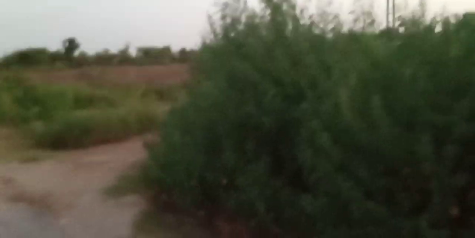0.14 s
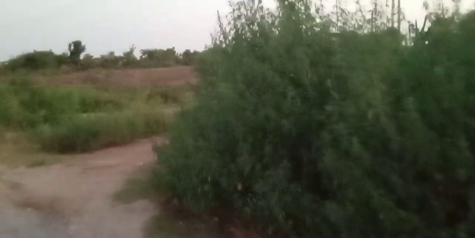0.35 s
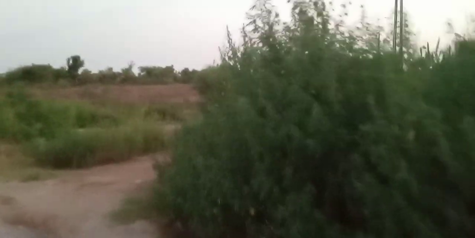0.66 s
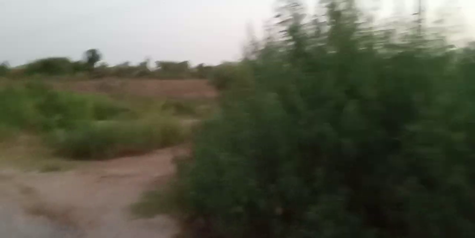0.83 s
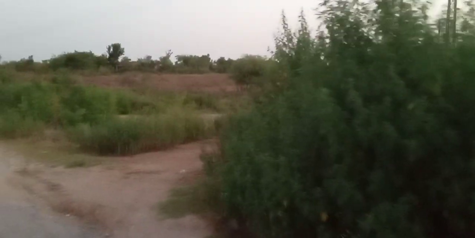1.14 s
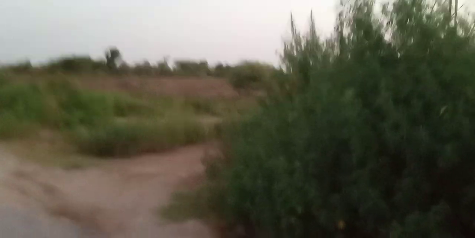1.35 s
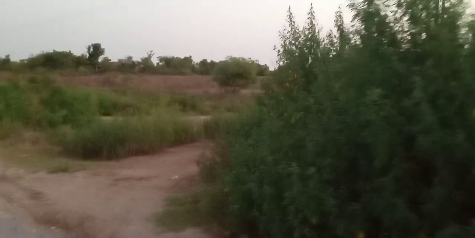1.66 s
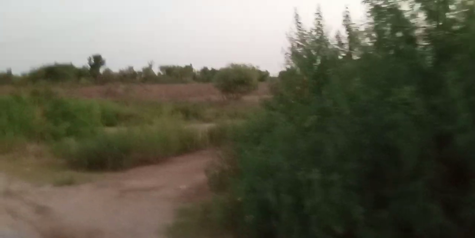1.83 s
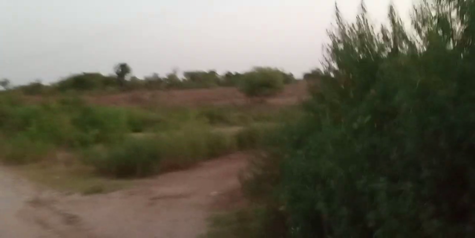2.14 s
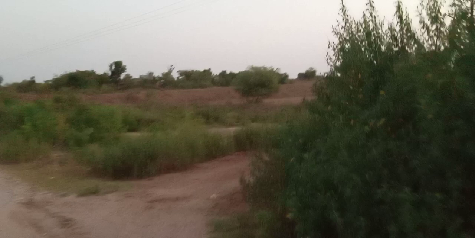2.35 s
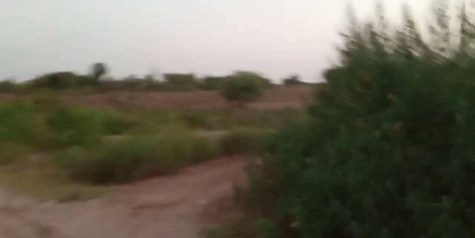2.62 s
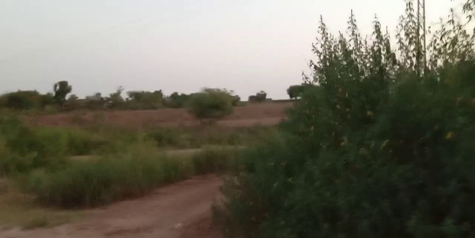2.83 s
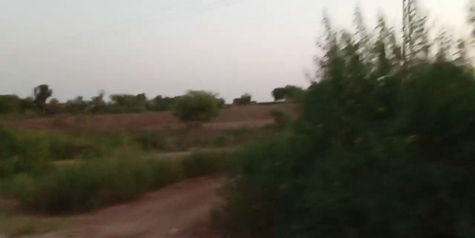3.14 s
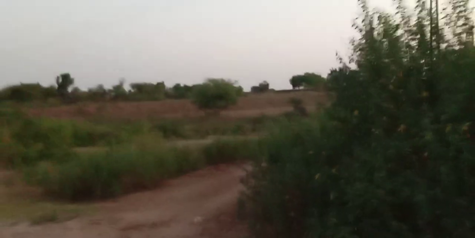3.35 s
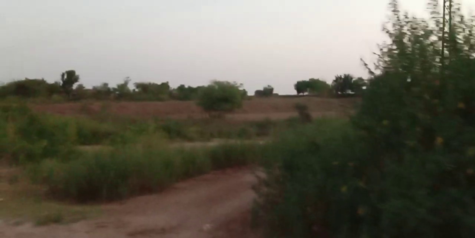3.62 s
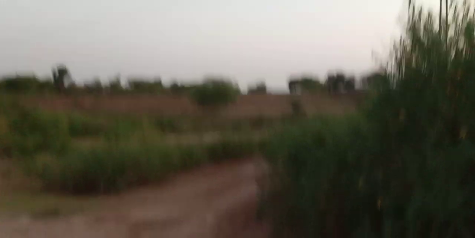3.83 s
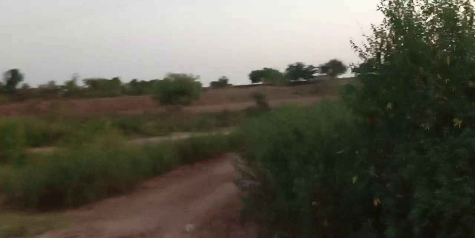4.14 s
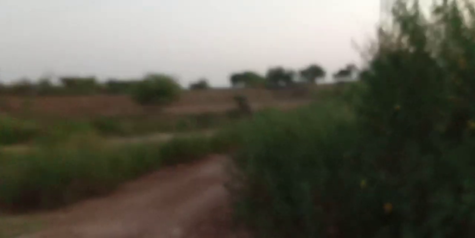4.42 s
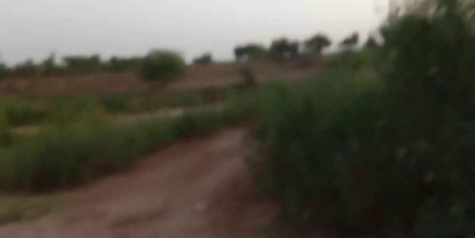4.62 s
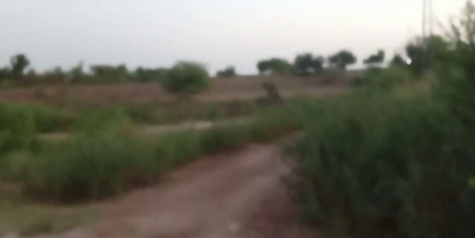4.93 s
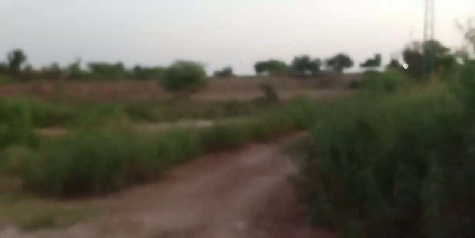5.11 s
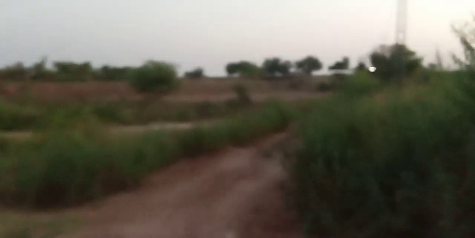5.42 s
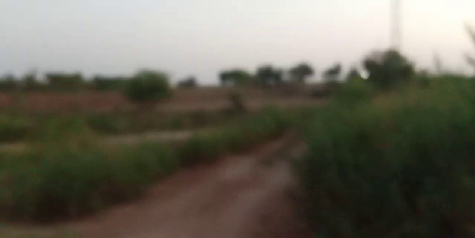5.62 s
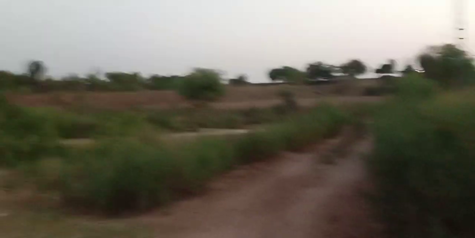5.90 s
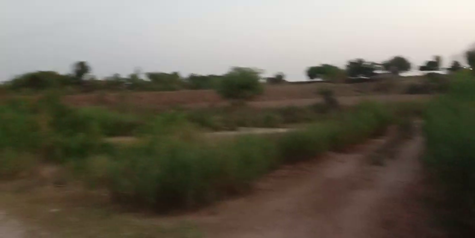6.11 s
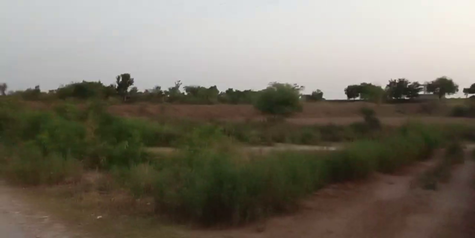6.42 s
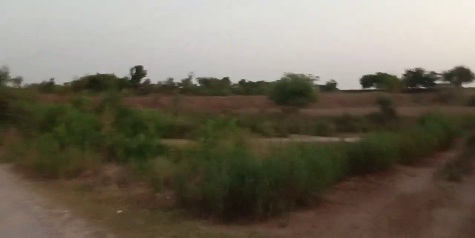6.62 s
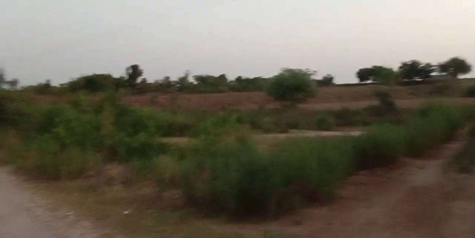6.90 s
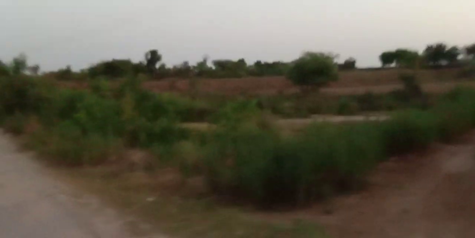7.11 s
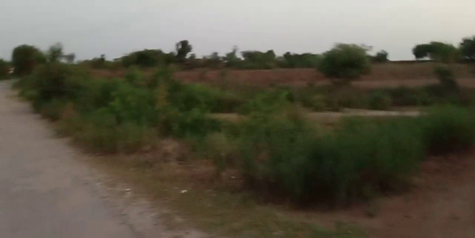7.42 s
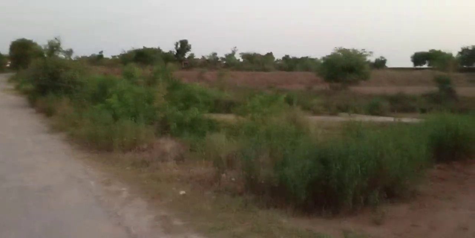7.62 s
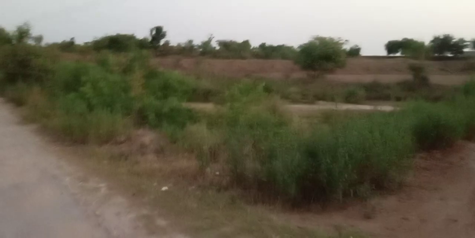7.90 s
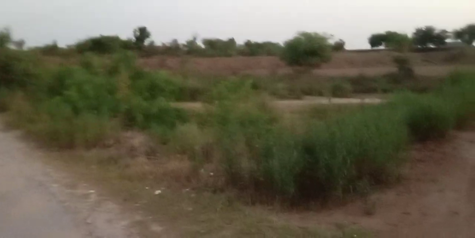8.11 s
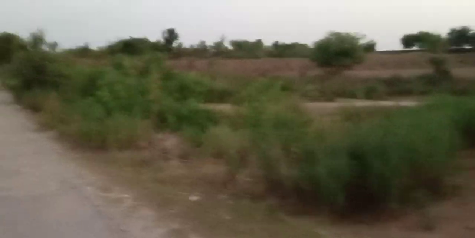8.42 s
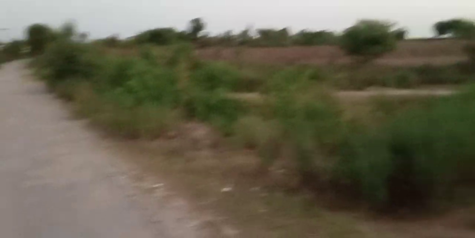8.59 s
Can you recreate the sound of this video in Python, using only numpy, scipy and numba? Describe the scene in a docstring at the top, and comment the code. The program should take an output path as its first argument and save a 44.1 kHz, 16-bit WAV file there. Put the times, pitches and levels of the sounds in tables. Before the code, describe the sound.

Continuous dense birdsong outdoors: rapid warbles, climbing and tumbling phrases, and rounded single chirps overlap at different sides. Rough buzzing calls and clear whistles come irregularly, with soft low slurs far off. Behind lie countless tiny chirps, a raspy insect that fades, and faint airy murmur. The small stereo microphone picks up low wind, skin rubs, clicks and dull knocks on its case, louder handling briefly ducking the birds; treble is muted, with slight hiss.

```python
"""Dawn chorus in scrubland

Heard on a hand-held phone turning slowly. Four small birds repeat phrases of gliding tones, bulbuls buzz
(pulse harmonics through throat resonances) and whistle, a far bird slurs low notes; behind them are a crowd
of short chirps, an insect of pulsed noise and far murmur. Wind bumps the left microphone port, fingers rub
and tick on the case, and a gain control driven by low sound on the left ducks after knocks."""
import sys
import numpy as np
from scipy import signal
from scipy.fft import rfft, irfft
from scipy.io import wavfile
from scipy.ndimage import uniform_filter1d
from numba import njit

SR = 44100
rng = np.random.default_rng(int(sys.argv[2]) if len(sys.argv) > 2 else 0)


def master(y):
    """Save y as 16-bit WAV."""
    cut = np.clip(np.atleast_2d(y).T, -1, 1)
    pcm = np.round(cut * 32767)  # scale
    wavfile.write(sys.argv[1], SR, pcm.astype(np.int16))


N = 385875

# kinds of burry bulbul note: (length [s], pulse start [Hz], pulse end [Hz], throat start [Hz],
# throat end [Hz], throat width [Hz], upper resonance [dB])
BURR_KINDS = {"rising": (0.088, 215, 250, 2500, 2760, 270, -10.5),
              "dropping": (.08, 399.5, 330, 2800, 2380, 150, -22),
              "long": (.175, 175, 150, 2250, 1810, 135, -8) , "level": (0.09, 212, 230, 2751, 2228, 122, -15.5),
              "low": (0.147, 240, 150, 1970, 1840.5, 98, -15),
              "short": (0.032, 219.5, 190, 2269, 2128, 142, -14)}


def undb(db):
    """Amplitude ratio: 20 dB is a factor of ten."""
    return 10 ** (np.asarray(db) / 20)


def level(x, db):
    """Root-mean-square scaling: unit power first, then a fixed or moving level in dB."""
    return x * undb(db) / np.sqrt(np.mean(x ** 2))


def curve(rows):
    """Linear interpolation: columns of a (time [s], value, ..) table at every sample."""
    s, *columns = np.transpose(rows)
    return [np.interp(np.arange(N) / SR, s, c) for c in columns]


def walk(rate):
    """Smoothed random steps: levels held 1 / rate seconds, slewed by two moving averages."""
    k = int(SR / rate)
    steps = np.repeat(rng.standard_normal(N // k + 1), k)
    return uniform_filter1d(uniform_filter1d(steps, k), k)[:N]


def coloured(points):
    """Spectral shaping: white noise weighted by (frequency [Hz], gain [dB]) points."""
    hz, db = np.transpose(points)
    bins = np.arange(N // 2 + 1) * SR / N + 1
    gain = undb(np.interp(np.log(bins), np.log(hz), db, -99, -99))
    return irfft(rfft(rng.standard_normal(N)) * gain, N)


def add(out, s, make, length, db, pan_db, lag_ms):
    """Level and time differences place a sound make(t); the left port hears it lag_ms late."""
    start, size = int(s * SR), int(length * SR) + 64
    keep = slice(max(-start, 0), max(N - start, 0))
    sides = [(pan_db / 2, lag_ms / 2000), (-pan_db / 2, -lag_ms / 2000)]
    for channel, (gain_db, lag) in enumerate(sides):
        t = np.clip((np.arange(size) - 32) / SR - lag, 0, length)
        piece = (undb(db + gain_db) * make(t))[keep]
        first = max(start, 0)
        out[channel, first:first + len(piece)] += piece


def flutter(length, rate, depth_db):
    """Scintillation: moving air and leaves between bird and phone waver the gain rate times a second."""
    points = undb(depth_db * rng.standard_normal(int(length * rate) + 2))
    return lambda t: np.interp(t * rate, np.arange(len(points)), points)


def note(length, hz0, hz1, hz2, edge=.75, top=.5, depth_db=3.5):
    """Frequency modulation: a near sine bends through three pitches, the middle one at share top."""
    bend, slope = 2 * (hz0 + hz2 - 2 * hz1), 4 * hz1 - 3 * hz0 - hz2
    p = np.log(.5) / np.log(top)  # warps time so that share top becomes one half
    waver = flutter(length, rate=140, depth_db=depth_db)

    def make(t):
        w = (t / length) ** p
        # integral of the pitch hz0 + slope * w + bend * w ** 2
        cycles = t * (hz0 + slope * w / (p + 1) + bend * w ** 2 / (2 * p + 1))
        envelope = np.abs(np.sin(np.pi * w)) ** edge
        return np.sqrt(2) * waver(t) * envelope * np.sin(2 * np.pi * cycles)
    return make


def bouts(rows, slowing_s):
    """Near-regular rhythm: phrase times and levels, each gap slowing_s longer than the one before."""
    k = np.arange(12)
    phrases = []
    for s, end, gap, db, swell_db in rows:
        at = s + gap * k + slowing_s * k * (k - 1) / 2
        sung = at < end
        phrases += zip(at[sung], (db + swell_db * k)[sung])
    return phrases


def songbirds():
    """Syllable repetition: four near birds, each note varying a little in pitch and strength."""
    # notes of one phrase: (time after phrase start [s], length [s], start [Hz], middle [Hz], end [Hz],
    # relative level [dB])
    arch_notes = [(.011, .106, 2440, 3610, 2494, 6.5)]
    hook_notes = [(0.00096, 0.083, 2944, 3610, 2410, -3)]
    warble_notes = [(.003, .028, 4380, 4140, 3800, 2), (.034, 0.03, 4730, 4640, 4250, 0.5),
                    (.055, 0.018, 4870, 4980, 4870, 3.5), (.085, .024, 4145, 4563, 4504, 6.5),
                    (.122, 0.031, 5940, 6400, 6640, -5), (.15, .022, 4610, 4600, 4500, -8.5)]
    climb_notes = [(-.14, 0.038, 4090, 3840, 3765, -10.5), (-.104, 0.022, 4100, 4000, 3800, -4),
                   (-.075, 0.026, 4800, 4680, 4500, -5), (-.048, 0.026, 5370, 5550, 5500, -2),
                   (-.018, 0.02, 4364, 4764, 4850, 5), (.014, 0.028, 6100, 6350, 6540, -4)]
    tumble_notes = [(-.1, 0.018, 4380, 4076, 4130, -2.5), (-.075, 0.018, 4740, 4526, 4490, 2),
                    (-.05, 0.05, 6440, 5480, 5115, 4.5), (-.012, .024, 4616, 4570, 4480, -1),
                    (.008, .018, 5240, 4650, 4230, 2), (.022, .03, 4293, 4070, 3470, 3),
                    (.05, 0.036, 4270, 3884, 3130, 1.5), (.078, .03, 4430, 4050, 3950, -4.5)]
    # uneven singers, phrase by phrase: (time [s], reference level [dB])
    arch_times = [(0.397, -49), (0.712, -46.5), (1.026, -46.5), (1.345, -43.5), (1.648, -45.5),
                  (1.946, -46), (2.265, -45.5), (2.608, -46.5)]
    hook_times = [(5.642, -44), (5.959, -43)]
    tumble_times = [(0.385, -43.5), (0.705, -41.5), (1.027, -42.5), (1.353, -42), (1.681, -38.5),
                    (2.013, -39), (2.349, -38), (2.681, -37.5), (3.018, -40), (3.363, -43), (3.714, -44),
                    (4.067, -39), (4.412, -38.5), (4.757, -42.5), (5.11, -39.5), (5.452, -36),
                    (5.807, -36.5), (6.16, -40.5)]
    # steady singers, bout by bout: (start [s], end [s], first gap [s], reference level [dB],
    # swell per phrase [dB])
    warble_bouts = [(.061, 3.5, .2985, -45, 0), (6.028, 8.75, .295, -50, 0.63)]
    climb_bouts = [(.174, 2, .327, -45, 1.2), (3.033, 3.5, 0.36, -44.5, -2),
                   (3.808, 4.6, .335, -40.5, -0.5), (6.467, 8, 0.33, -38, 0)]
    # the tumbling singer drifts across as the phone turns: (time [s], left minus right [dB])
    tumble_pan = [(.4, 6), (2.7, 3.5), (3.7, 7), (4.8, -11), (5.5, -1)]

    out = np.zeros((2, N))
    # (notes, phrases, left minus right [dB] at a time, lag of the left port [ms])
    singers = [(arch_notes, arch_times, lambda s: 2.5, -.27),
               (hook_notes, hook_times, lambda s: 2.5, -.27),
               (warble_notes, bouts(warble_bouts, slowing_s=0), lambda s: 11, .385),
               (climb_notes, bouts(climb_bouts, slowing_s=.005), lambda s: -6, -.52),
               (tumble_notes, tumble_times, lambda s: np.interp(s, *np.transpose(tumble_pan)), -.09)]
    for phrase, rows, pan_db, lag_ms in singers:
        top = .43 if len(phrase) == 1 else .5  # single notes reach the middle pitch early
        for s, db in rows:
            for after, length, *hz, rel_db in phrase:
                tune, vary_db = rng.standard_normal(2) * (.004, 1.2)
                sound = note(length, *np.multiply(hz, 1 + tune), top=top)
                add(out, s + after, sound, length, db + rel_db + vary_db, pan_db(s), lag_ms)
    return out


def buzz(length, pulse0, pulse1, hz0, hz1, width_hz, upper_db):
    """Source and filter: pulse harmonics through two throat resonances, gliding fast, then settling."""
    scoop_hz, scoop_s = 603, .005  # the throat opens from below at the onset
    upper_hz = 600  # second resonance, above the first
    attack_s, release_s = .003, .02
    k, shift = np.arange(4, 24)[:, None], rng.uniform(0, 2.4, (20, 1))
    wavers = [flutter(length, rate=90, depth_db=4) for _ in k]
    slip = flutter(length, rate=80, depth_db=1.2)  # used as a wandering phase [rad]

    def make(t):
        left = 1 - t / length
        pulse = pulse1 + (pulse0 - pulse1) * left ** 2
        cycles = pulse1 * t + (pulse0 - pulse1) * length * (1 - left ** 3) / 3
        throat = hz1 + (hz0 - hz1) * left ** 4 - scoop_hz * np.exp(-t / scoop_s)

        def resonance(hz):
            return np.exp(-.5 * ((k * pulse - hz) / width_hz) ** 2)
        gains = resonance(throat) + undb(upper_db) * resonance(throat + upper_hz)
        gains = gains * [w(t) for w in wavers]
        wave = (gains * np.sin(k * (2 * np.pi * cycles + slip(t)) + shift)).sum(0)
        steady = wave * np.sqrt(2 / (gains ** 2).sum(0))  # same power whichever harmonics pass
        return steady * np.minimum(np.minimum(t / attack_s, (length - t) / release_s), 1)
    return make


def bulbuls():
    """Two voicings: straight gliding whistles, and burry notes from a pulsed source."""
    # (time [s], length [s], start [Hz], end [Hz], level [dB], left minus right [dB])
    whistles = [(1.165, 0.049, 2080, 2308, -36, -6.5), (1.851, 0.078, 2350, 2244, -53, 16),
                (3.253, 0.012, 1970, 2440, -35.5, -10), (3.255, 0.15, 1653, 1588, -38, -9),
                (3.39, 0.027, 1566, 1416, -48, -14.5), (3.772, 0.055, 2610, 2765, -48, -2),
                (4.007, 0.018, 2660, 2250, -42, 8), (6.84, 0.088, 2505, 2660, -45.5, 2),
                (7.158, 0.24, 800, 787, -54.5, -1.5), (7.347, 0.052, 2375, 2190, -49, 21),
                (7.992, 0.069, 2063, 2230, -34, -4.5), (8.438, 0.062, 2656, 2630, -44, -5)]
    # burry notes sung, by kind: (time [s], level [dB], left minus right [dB])
    burry_notes = {"rising": [(0.798, -38.5, -7.5), (5.348, -40.5, -9.5), (7.582, -38, -8.5)],
                   "dropping": [(.965, -41, -11), (7.28, -47, 20), (7.79, -40, -11.5)],
                   "long": [(1.025, -37, -4.5), (7.853, -36, -4)], "level": [(3.03, -37, -8),
                   (3.57, -52, 23), (4.01, -50.5, 20.5)], "low": [(6.65, -46.5, 4)],
                   "short": [(2.88, -55, 10), (3.183, -39, -9), (4.21, -47, 17)]}

    out = np.zeros((2, N))
    for s, length, hz0, hz1, db, pan_db in whistles:
        sound = note(length, hz0, (hz0 + hz1) / 2, hz1, edge=.3, depth_db=2.5)
        add(out, s, sound, length, db, pan_db, .32)
    for kind, rows in burry_notes.items():
        for s, db, pan_db in rows:
            add(out, s, buzz(*BURR_KINDS[kind]), BURR_KINDS[kind][0], db, pan_db, .38)
    return out


def far_low_bird():
    """Slow frequency glide: low notes slur up to a top pitch and down again."""
    # (time [s], length [s], start [Hz], top [Hz], end [Hz], share sung before the top, level [dB])
    slurs = [(1.647, 0.33, 1055, 1312, 1124, 0.81, -46), (1.996, 0.18, 1143, 1281, 1075, 0.51, -51),
             (3.96, .19, 1060, 1164, 1027, 0.68, -56), (7.467, .32, 966, 1223, 992, 0.65, -54.5),
             (7.948, 0.35, 1017, 1290, 970, 0.79, -48)]

    out = np.zeros((2, N))
    for s, length, *hz, top, db in slurs:
        sound = note(length, *hz, edge=.51, top=top, depth_db=1)
        add(out, s, sound, length, db, pan_db=6.5, lag_ms=.32)
    return out


def far_bulbuls(count):
    """Random superposition: burry notes from far bushes at chance moments, pitches and sides."""
    out = np.zeros((2, N))
    times = rng.uniform(0, N / SR, count)
    for when, (tune, vary, pan) in zip(times, rng.standard_normal((count, 3))):
        length, *hz, upper_db = BURR_KINDS["low"]
        sound = buzz(length, *np.multiply(hz, 1.13 + .09 * tune), upper_db)
        add(out, when, sound, length, -56.5 + 2.2 * vary, 5 * pan, .38)
    return out


def crowd(count, centre_hz, spread_hz, fall, length, lag=20):
    """Incoherent summation: far chirps, mostly falling; the left port hears them about lag samples late."""
    size = int(length * SR)
    at = rng.integers(0, N, count)
    pitch, glide, vary, pan = rng.standard_normal((4, count, 1))
    u = np.arange(size) / size
    hz = centre_hz + spread_hz * 2 * np.tanh(pitch / 2)
    cycles = hz * length * (u + fall * (1 + glide) * u * (1 - u))
    chirps = np.sin(np.pi * u) * np.sin(2 * np.pi * cycles) * undb(2 * vary)
    where = (at[:, None] + np.arange(size)).ravel()
    lean_db = 1.7 + 1.5 * pan
    sides = []
    for late, side in [(int(lag), 1), (0, -1)]:  # left, right
        jitter = rng.integers(0, 5, count).repeat(size) * (side < 0)
        weights = (chirps * undb(side * lean_db)).ravel()
        summed = np.bincount(where + late + jitter, weights, N + size + 30)
        sides.append(summed[size:N + size])
    return level(np.array(sides), 0)


def insect():
    """Amplitude modulation: a noise band restarts and decays about 150 times a second, strongest right."""
    # level in the right channel: (time [s], level [dB])
    insect_level = [(0, -47), (2.2, -48.5), (2.6, -41), (3.15, -64), (3.35, -43), (4.085, -41), (4.1, -52),
                    (8.75, -56)]
    phase = np.cumsum(150 * (1 + .031 * walk(6.2))) / SR % 1
    band = coloured([(5900, -18.5), (6250, .5), (6450, -4), (6750, -26)])
    ring = band * np.exp(-phase / .71)
    return level(ring, curve(insect_level)[0]) * undb([[-8], [0]])


def thump(t):
    """Damped flexure of the case: a pitch that sinks as the swing dies."""
    base_hz, drop_hz, drop_s, decay_s = 96, 415, .0028, .012
    cycles = base_hz * t + drop_hz * drop_s * (1 - np.exp(-t / drop_s))
    return np.sin(2 * np.pi * cycles) * np.exp(-t / decay_s)


def fingers():
    """Friction and impact: rubs are shaped noise, ticks and snaps decaying noise, thuds a damped swing."""
    # rubs: (time [s], length [s], level [dB])
    rubs = [(3.792, 0.17, -48.5), (4.135, 0.16, -55.5), (4.527, 0.23, -53.5), (6.415, 0.24, -52),
            (7.026, 0.42, -60)]
    # ticks: (time [s], crack level [dB], thump level [dB])
    ticks = [(0.7215, -23.5, -45), (3.849, -26, -45), (4.58, -33.5, -41), (4.596, -27, -34.5),
             (4.6345, -31, -29), (4.67, -31, -42), (4.699, -40, -47), (5.8517, -36.5, -45.5),
             (6.44, -34, -42.5), (6.5176, -16.5, -27.5), (7.1354, -41, -44.5), (8.332, -37.5, -42.5),
             (8.4422, -34, -43)]
    # soft knuckle thuds: (time [s], level [dB])
    thuds = [(1.449, -47.5), (3.903, -47), (4.273, -49), (7.037, -50), (7.059, -52), (7.174, -49)]
    # sharp nail snaps: (time [s], level [dB])
    snaps = [(3.8434, -23), (3.9473, -21), (4.615, -18.5), (6.5189, -19.5)]

    out = np.zeros((2, N))
    skin = coloured([(100, -6), (300, 0), (1000, -7), (3500, -14), (6500, -22)])
    rub = level(skin, 7 * walk(80))
    for s, length, db in rubs:
        start = int(s * SR)
        add(out, s, lambda t: rub[start:start + len(t)] * np.sin(np.pi * t / length), length, db, 12, .4)
    for s, crack_db, _ in ticks:
        grit = uniform_filter1d(rng.standard_normal(512), size=5)
        add(out, s, lambda t: grit[(t * SR).astype(int)] * np.exp(-t / .0034) * (t > 0),
            .006, crack_db, 18, 0)
    for s, *_, db in ticks + thuds:
        add(out, s, thump, .06, db, 24, 0)
    for s, db in snaps:
        grit = np.diff(rng.standard_normal(512))  # differencing favours the treble
        add(out, s, lambda t: grit[(t * SR).astype(int)] * np.exp(-t / .00072) * (t > 0),
            .004, db, 20, 0)
    return out


def taps():
    """Damped resonance: small hollow taps ahead, each a decaying sine."""
    # (time [s], level [dB], ring [Hz])
    tap_rows = [(1.821, -35, 830), (2.605, -33, 2140), (4.189, -26.5, 1840)]
    decay_cycles = 3.7
    out = np.zeros((2, N))
    for s, db, hz in tap_rows:
        add(out, s, lambda t: np.sin(2 * np.pi * hz * t) * np.exp(-t * hz / decay_cycles),
            5 * decay_cycles / hz, db, 1.5, 0)
    return out


def wind():
    """Turbulent pressure at the ports: gusting low noise and brief low bumps, strongest on the left; the two
    higher-pitched bumps are thumps on the case."""
    # level around which gusts vary, before the side offsets: (time [s], level [dB])
    wind_level = [(0, -58.5), (3.4, -54.5), (4, -53.5), (4.7, -53.5), (5.2, -63), (5.9, -54), (7.2, -51),
                  (7.6, -63), (8.3, -50.5), (8.75, -58)]
    # bumps: (time [s], level [dB], pitch [Hz]); the two near 350 Hz are thumps on the case
    bumps = [(1.275, -45.5, 110.3), (2.055, -43.5, 86.4), (4.334, -43.5, 72.2), (4.591, -29, 154),
             (4.706, -38.5, 345), (7.282, -44.5, 378), (6.311, -41.5, 94.14), (6.385, -38.5, 99),
             (7.124, -40.5, 90.8), (7.247, -39, 96), (8.426, -40.5, 120.6), (8.542, -43.5, 112)]
    bump_cycles = 2.45

    gust = curve(wind_level)[0] + 5 * walk(13)
    rumble = [(25, -35.5), (50, -9.5), (80, -3.5), (160, -12), (300, -28.5), (700, -26)]
    out = np.array([level(coloured(rumble), gust + 3), level(coloured(rumble), gust - 9)])
    for s, db, hz in bumps:
        add(out, s, lambda t: np.sin(np.pi * t * hz / bump_cycles) ** 2 * np.sin(2 * np.pi * hz * t),
            bump_cycles / hz, db, 24, 0)
    return out


def air():
    """Independent band modulation: in still air and far birds each third of the range swells alone."""
    # (frequency [Hz], relative level [dB])
    spectrum = [(150, -20), (300, -18.5), (1500, -23.5), (1850, -18), (2150, -12), (2900, -19.5),
                (3500, -19), (4100, -16), (4700, -16), (6300, -10.5), (6900, -19)]
    hz = [f for f, _ in spectrum]
    low, high = hz.index(1500), hz.index(2900)
    bands = [spectrum[:low + 1], spectrum[low:high + 1], spectrum[high:]]
    swells = [undb(-28.5 + 2.5 * walk(4.4) + 4.5 * walk(15)) for _ in bands]
    return np.array([sum(g * coloured(b) for g, b in zip(swells, bands)) for _ in range(2)])


def scrub(birds):
    """Diffuse scattering: convolution with exponentially decaying noise gives the scrub's tail."""
    t60_s, tail_db = .2, -8.5
    t = np.arange(int(t60_s * SR)) / SR
    tail = rng.standard_normal((2, len(t))) * np.exp(-np.log(1000) * t / t60_s) * (t > .012)
    tail *= undb(tail_db) / np.sqrt((tail ** 2).sum(1, keepdims=True))
    blend = birds.mean(0, keepdims=True) + .5 * birds
    return signal.fftconvolve(blend, tail, axes=1)[:, :N]


def scene():
    """Linear superposition: birds with their scattered tail, over air, insect, wind and handling."""
    # level of the dense crowd: (time [s], level [dB])
    crowd_level = [(0.0, -41.5), (0.83, -43), (5.31, -38.5), (6.94, -39.5), (7.63, -47), (8.75, -44)]
    birds = songbirds() + bulbuls() + far_low_bird() + far_bulbuls(count=70)
    dense = crowd(count=14000, centre_hz=5430, spread_hz=440, fall=.02, length=.018)
    middle = crowd(count=340, centre_hz=4406, spread_hz=334, fall=.03, length=.02)
    low = crowd(count=110, centre_hz=2400, spread_hz=280, fall=.06, length=.05)
    birds = birds + undb(curve(crowd_level)[0]) * dense + undb(-48) * middle + undb(-61) * low
    return birds + scrub(birds) + insect() + fingers() + taps() + wind() + air()


@njit
def follower(x, release):
    """Peak detection: the level jumps up at once and sinks exponentially."""
    e, y = 0., np.empty(len(x))
    for i in range(len(x)):
        e = max(x[i], e * release)
        y[i] = e
    return y


def record(dry):
    """Compression and band-limiting: low peaks on the left duck both channels; treble is weak; hiss."""
    # converter hiss: (frequency [Hz], relative level [dB])
    hiss_spectrum = [(7500, -43.5), (9500, -25), (11000, -13), (14000, -12), (14800, 2), (15800, -2.5)]
    threshold_db, release_s = -33, .016
    voice_top_hz, top_hz = 6830, 15750

    low = signal.sosfilt(signal.butter(2, 900, fs=SR, output="sos"), dry[0])
    peak = follower(np.abs(low), np.exp(-1 / (release_s * SR)))
    gain = np.minimum(1, (undb(threshold_db) / (peak + 1e-9)) ** .63)
    ducked = dry * uniform_filter1d(gain, size=88, origin=43)  # averages past samples: 2 ms attack
    voice = signal.sosfilt(signal.ellip(10, .3, 80, voice_top_hz, fs=SR, output="sos"), ducked)
    treble = signal.sosfilt(signal.butter(6, 7400, "high", fs=SR, output="sos"), ducked)
    hiss = np.array([level(coloured(hiss_spectrum), -77.5 + 1.5 * walk(7.5)) for _ in range(2)])
    mix = voice + undb(-25.5) * treble + hiss
    return signal.sosfilt(signal.ellip(10, .2, 70, top_hz, fs=SR, output="sos"), mix)


dry = scene()
out = record(dry)
master(out)
```